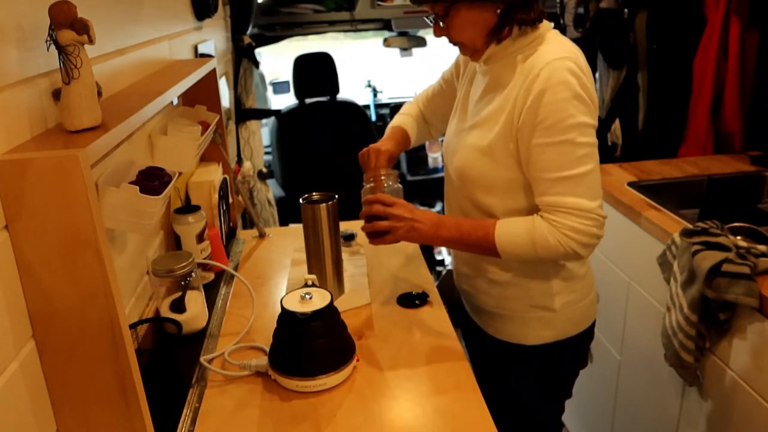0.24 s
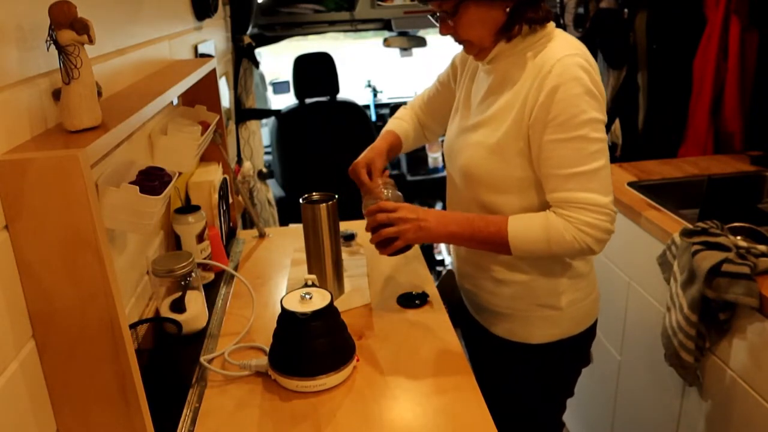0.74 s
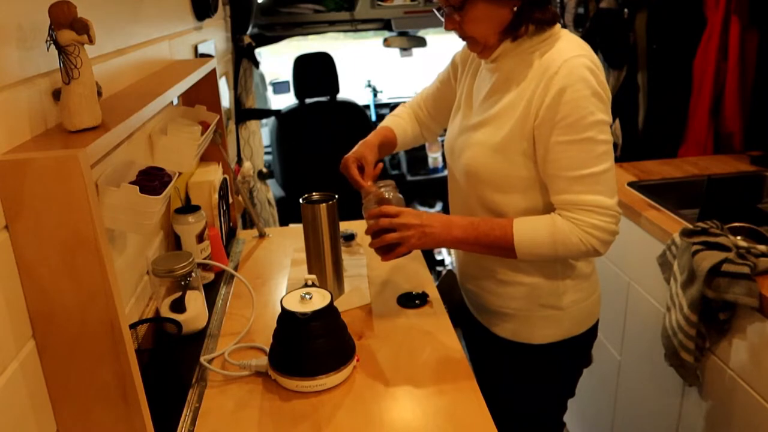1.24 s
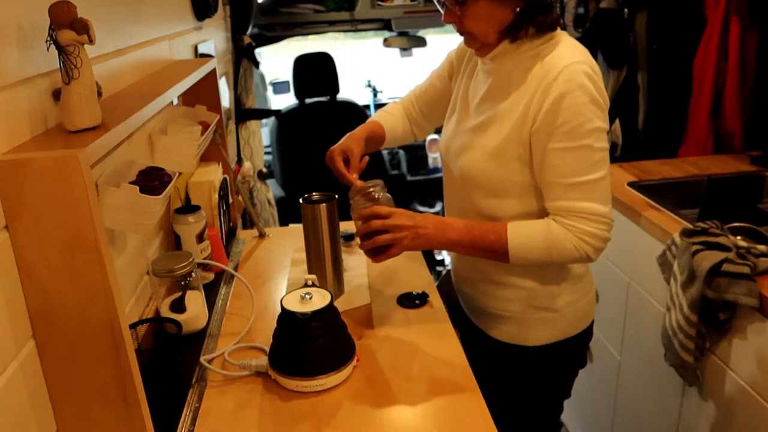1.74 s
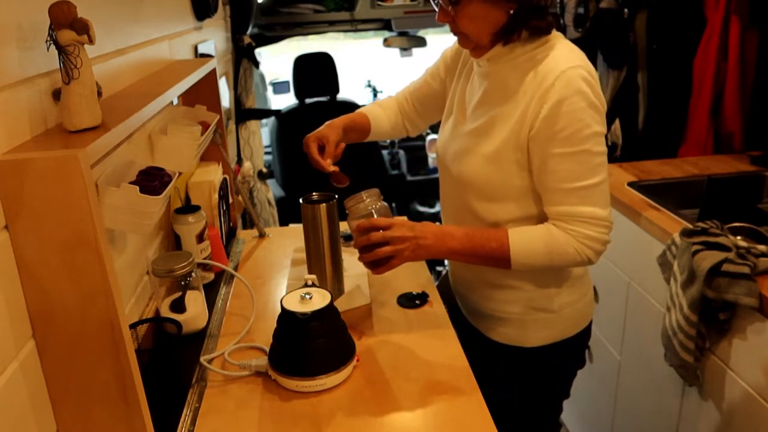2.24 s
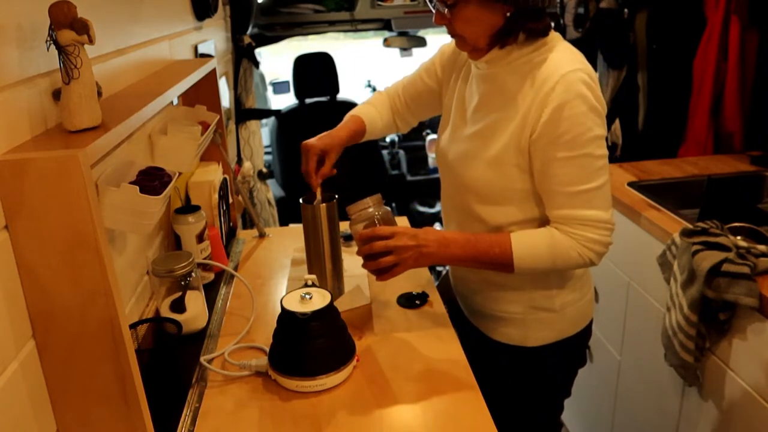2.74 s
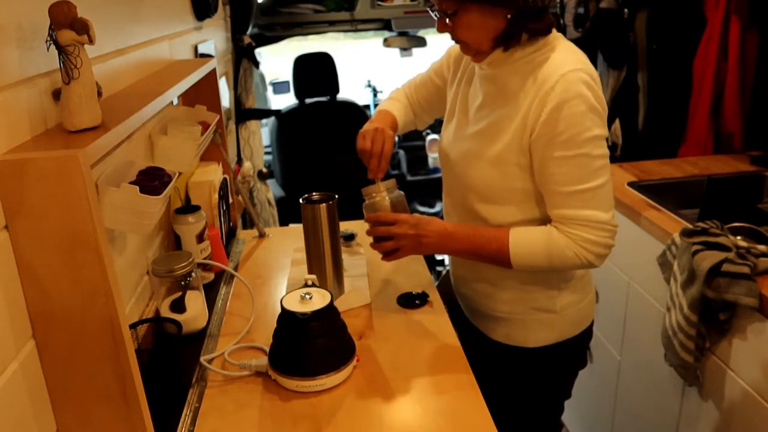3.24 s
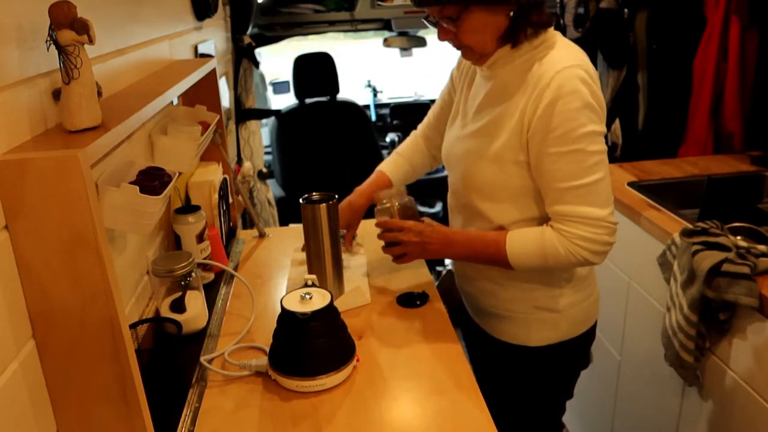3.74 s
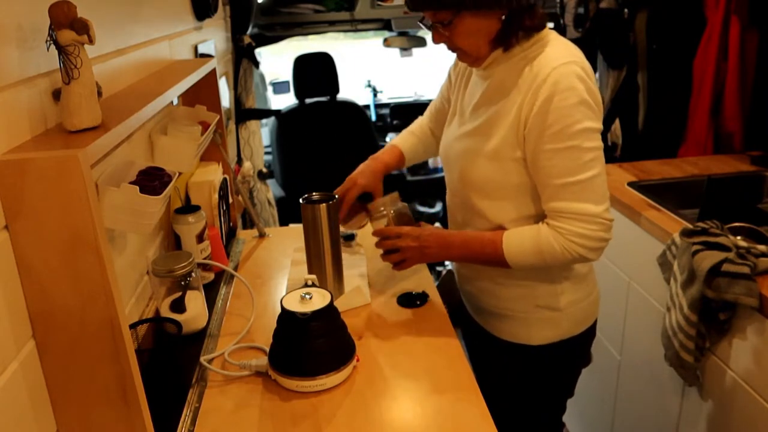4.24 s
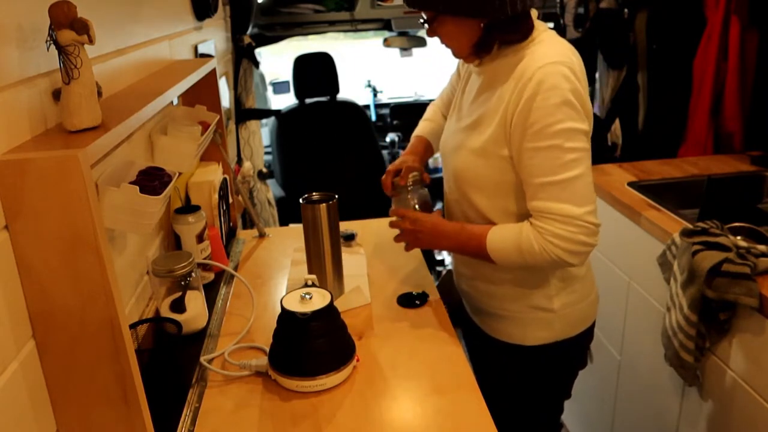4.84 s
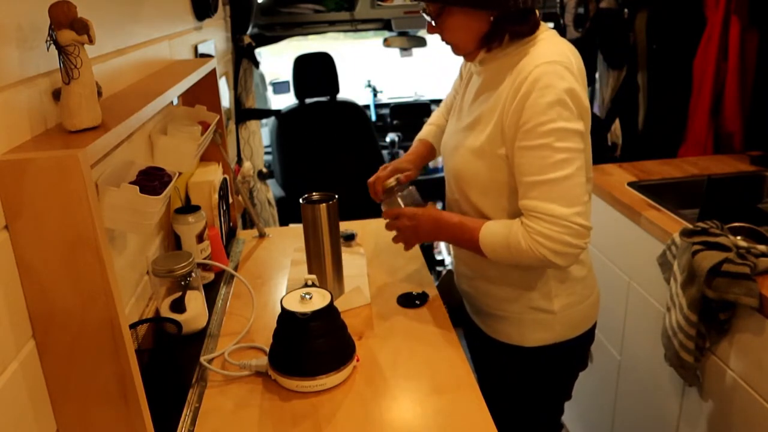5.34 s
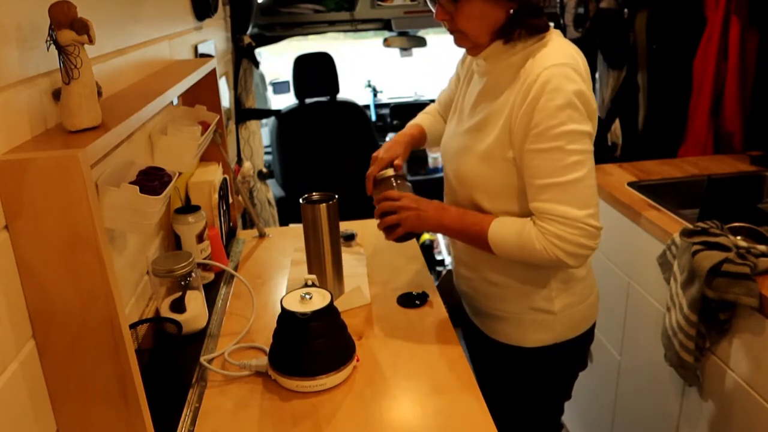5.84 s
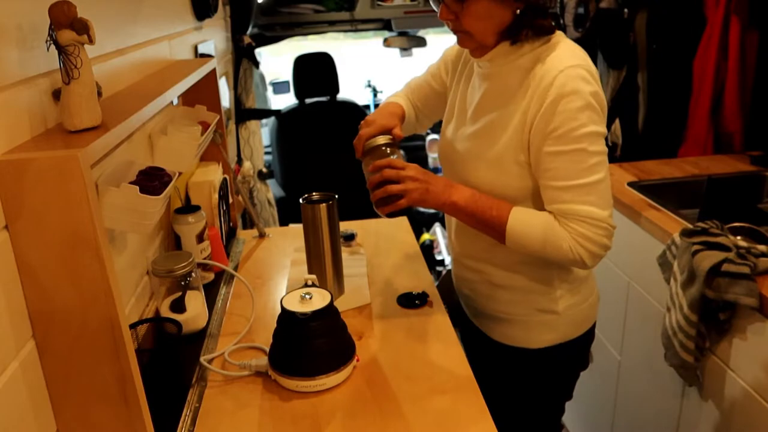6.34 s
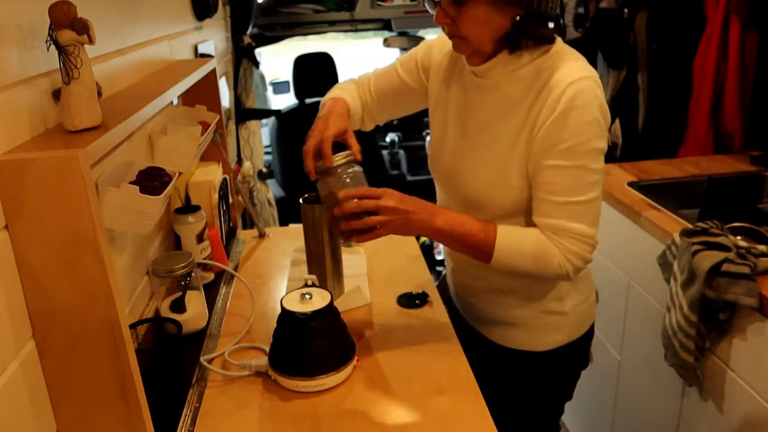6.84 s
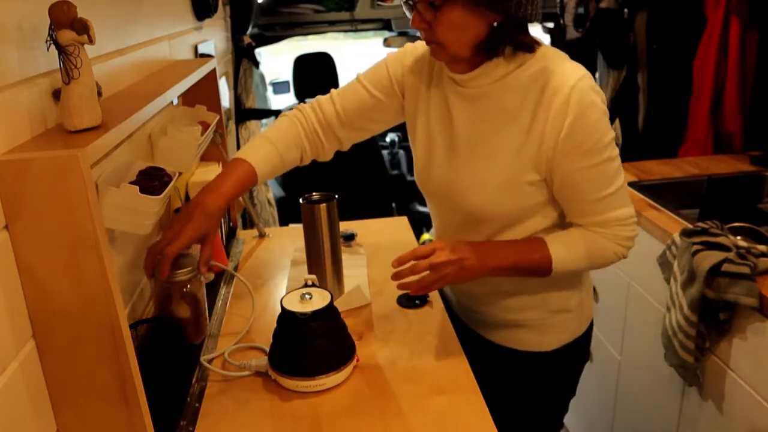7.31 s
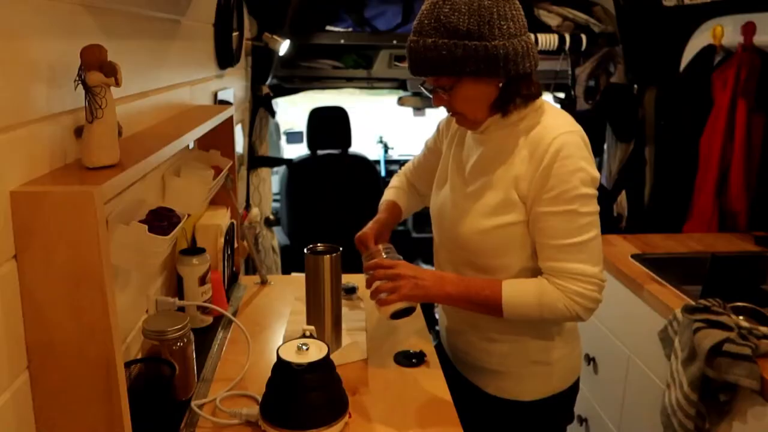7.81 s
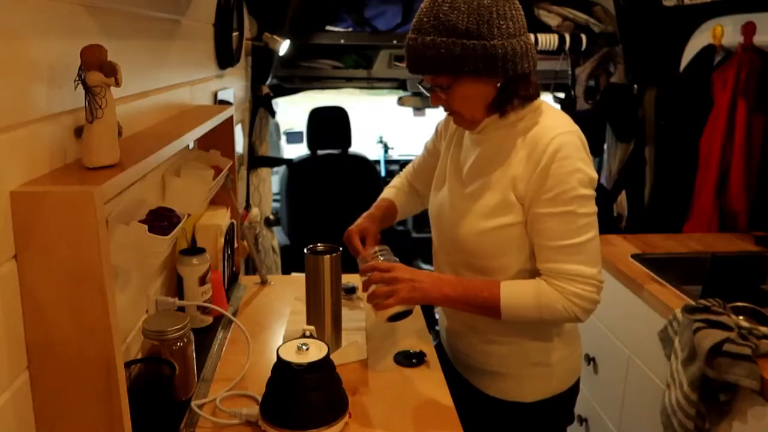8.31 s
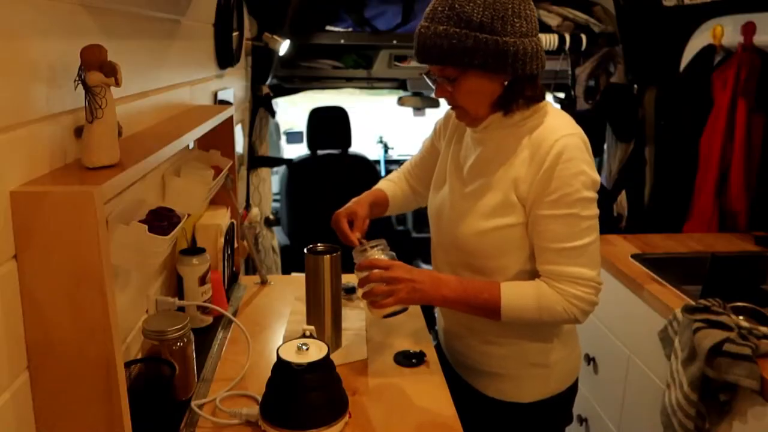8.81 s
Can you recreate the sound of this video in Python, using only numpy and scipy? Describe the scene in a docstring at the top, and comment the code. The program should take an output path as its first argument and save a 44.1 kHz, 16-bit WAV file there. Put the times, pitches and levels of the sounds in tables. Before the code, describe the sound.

A spoon scoops dry granules from a glass jar, they patter into a steel flask, then glassy clinks and lid knocks over a soft fan hum.

```python
"""A small knock over a humming fan, then a spoon scooping dry granules from a glass jar in a small kitchen.
Granules patter into a steel flask, the spoon clinks on glass, the lid is knocked on and screwed down;
the jar is put away with dull thuds and a second one is scooped. A faint, regular high squeak runs along.
Scoops and rubs are filtered micro-impacts, the flask is a bank of resonators fed by random grains,
blows on the jar are decaying modes with noise at the contact, and the fan is hum lines over coloured noise."""
import sys
import numpy as np
from scipy import signal
from scipy.fft import rfft, irfft, next_fast_len
from scipy.io import wavfile
from scipy.ndimage import uniform_filter1d

SR = 44100
rng = np.random.default_rng(int(sys.argv[2]) if len(sys.argv) > 2 else 0)


def digitize_waveform(pressure):
    """Quantize a signal to 16-bit integers and store it at the path in sys.argv[1].

    Rows of a 2-D input are taken as channels; values are limited to [-1, 1].
    """
    field = np.atleast_2d(pressure).T
    bounded = np.clip(field, -1, 1)
    quanta = np.round(bounded * 32767).astype(np.int16)
    wavfile.write(sys.argv[1], SR, quanta)


N = 399987

# All levels in the tables are relative unless marked otherwise.
# Spoon strokes through the granules: start_s, length_s, level_db, swell_db (over the stroke),
# hollow_db and treble_db (against the level), dulling_db (over the stroke)
SCOOPS = [(.155, 0.13, -42.5, -1, -1, -15.5, 13.5), (.375, .31, -39.5, 5.5, -11, -7, -1),
          (3.345, 0.063, -45.5, 5, 1, -3.5, 9.5), (7.68, 0.18, -45.5, -1.5, -4, -8, -0.5),
          (7.92, 0.072, -37.5, 12, -17, -8.5, 1)]
# Spectrum of the granules under the spoon: freq_hz, density_db (per Hz)
SCOOP_COLOUR = [(400, -25), (650, -4.5), (950, -0.5), (1090, -2), (1380, 3), (1600, -1), (2300, 6.5),
                (3200, 1), (3900, -4.5), (5500, -12), (6800, -14), (7700, -18.5), (10500, -22),
                (13500, -25.5), (15500, -42)]
# Metal sliding on the glass rim and thread: start_s, length_s, level_db, swell_db, hollow_db,
# treble_db, dulling_db, as for the spoon strokes
RUBS = [(4.56, 0.071, -39, 3, -16, -3.5, 14), (4.932, 0.02, -41.5, -1, 5.5, -6, 11),
        (5.32, 0.23, -51.5, 0, -0.5, -0.5, 1), (5.75, 0.1, -45, -10, -2, -4.5, 1),
        (6.025, 0.053, -39, -4, -1, -7, 4), (6.232, 0.082, -41, 3.5, 1.5, -8, -7),
        (6.526, .016, -46, -2, 1, -8, 2), (6.573, 0.014, -46.5, -2, 0, -7.5, 3)]
# Spectrum of metal on glass: freq_hz, density_db (per Hz)
RUB_COLOUR = [(200, -6), (390, 12.5), (500, 6), (630, 1), (800, 3), (950, 1), (1490, -5), (2300, -2),
              (2750, -3), (3450, -3.5), (4000, -14.5), (5200, -17), (7500, -22.5), (10000, -21.5),
              (12500, -21), (15500, -38)]
# Granules falling into the flask, a clump and then a stream: time_s, flow_db
POUR = [(2.77, -42), (2.815, -30), (2.822, -14), (2.84, -29), (2.895, -20.5), (2.955, -25.5), (3.0, -32),
        (3.06, -44), (3.14, -62)]
# Ringing modes of the steel flask: freq_hz, level_db, t60_s
FLASK = [(1545, -24, 1), (1836, -22, 1), (2078, 2, .12), (2328, -8, 1.1), (4710, -14, .75), (5179, -20, .5),
         (7820, -6, .1), (9620, -7, .09), (9798, -9, .1), (2040, -3, .1), (2145, -5, .1), (2860, -17, .046),
         (3140, -9, .08), (3340, -10, .06), (3620, -20, .04), (4840, -21, .05), (5959, -19, .06),
         (7040, -20, .1), (8800, -15, .026), (10250, -13, .028), (10540, -11, .05), (10690, -11, .05),
         (11350, -12, .025), (11650, -16, .06), (12120, -16, .06), (12550, -19, .025), (13300, -16, .025)]
# Dry patter of granules on the steel: freq_hz, density_db (per Hz)
PATTER = [(1500, -37), (3000, 2), (4300, -15), (7000, -7), (10500, 1), (13500, -1), (15500, -23)]
# Spoon tapping the glass: start_s, level_db, pitch_hz (the favoured one), hardness_db
CLINKS = [(4.032, -44, 2000, 0), (4.163, -34, 2010, -6), (4.4424, -19.5, 2000, 2), (4.4483, -13.5, 2686, 3),
          (4.4762, -8.5, 1950, -9), (4.5438, -13, 3330, 6), (4.562, -24.5, 2120, -1), (4.574, -24, 3200, 4),
          (4.762, -20.5, 2020, -5), (4.887, -37, 2700, 10), (6.575, -34, 2010, -5)]
# Lid and spoon knocking on the jar: start_s, level_db, pitch_hz (the favoured one), hardness_db
KNOCKS = [(.033, -30, 2660, 7), (4.3585, -10, 1433, 7), (4.584, -22.5, 3200, 19), (4.603, -14.5, 1285, 1),
          (4.615, -19, 2790, 10), (4.753, -27.5, 2110, -2), (4.776, -8.5, 1954, 4),
          (4.939, -29, 1380, 19.5), (5.109, -23, 2780, 7), (5.117, -12, 2350, 14), (5.898, -24.5, 2930, -8),
          (5.978, -28, 1010, -20), (6.005, -26, 1490, -6), (6.035, -21.5, 3200, -8), (6.2, -11, 3230, -11),
          (6.202, -7.5, 1415, -5), (6.247, -19.5, 1770, -4), (6.273, -19, 1780, 4), (6.287, -12, 1510, -13),
          (6.478, -36, 1460, 11), (6.523, -29, 1900, -11), (6.873, -39, 3320, 11), (7.428, -33.5, 1250, -8),
          (7.916, -25, 2880, 10)]
# Modes of the hand-held glass jar: freq_hz, level_db, t60_s (before each use scales it)
JAR = [(623, -1.5, 0.14), (646, -2, 0.12), (786, 0.5, 0.095), (985, 0, 0.079), (1226, 0.5, 0.096),
       (1343, 9.5, 0.031), (1510, 1, 0.035), (1796, 1, 0.11), (2005, 3.5, 0.071), (2103, -4, 0.25),
       (2420, -5, 0.031), (2595, -6, 0.31), (2770, 7, 0.08), (2953, 2.5, 0.045), (3225, 1, 0.051),
       (3300, 4, 0.053), (3360, 12.5, 0.015), (3640, -2, 0.14), (4004, 13, 0.02), (4410, -2, 0.071),
       (4570, -6.5, 0.14), (4624, -0.5, 0.075), (5064, 4.5, 0.04), (5500, -7, 0.066), (6650, -1.5, 0.064),
       (7300, -19, .09)]
# Crack of noise at the contact: freq_hz, density_db (per Hz)
CRACK = [(150, -3.5), (500, 1.5), (830, -6.5), (1300, -0.5), (3200, -1), (5000, -15.5), (7500, -31),
         (15000, -60)]
# Bright tick at the contact: freq_hz, density_db (per Hz)
TICK = [(4500, -28), (5700, 6), (6300, 7), (6900, -2), (7600, -6), (9000, 0), (10200, -3.5), (12000, -6.5),
        (13500, -7), (15500, -37)]
# Dull thuds of jar, hand and shelf: start_s, level_db, pitch_hz
THUDS = [(4.358, -33.5, 388), (4.581, -32, 385), (4.617, -20, 320), (4.755, -24.5, 242), (4.775, -16, 231),
         (4.894, -27, 217), (4.92, -24, 209), (4.939, -24.5, 184), (5.114, -19, 240), (5.332, -31.5, 181),
         (6.032, -23.5, 195), (6.2, -21.5, 214), (6.284, -24.5, 201), (7.514, -22.5, 110), (7.54, -24, 70)]
# Fan and mains lines: freq_hz, level_db (rms, before the waver)
HUM = [(60, -57), (120, -57), (149.8, -44), (209, -59), (314.4, -57.5), (390, -63), (452, -62)]
# Rush of air from the fan: freq_hz, density_db (per Hz)
AIR = [(20, -30), (40, -6), (58, -11), (80, -8.5), (125, -14.5), (200, 0), (300, -7), (520, -12),
       (680, -19), (790, -13.5), (1000, -20), (3000, -25.5), (8000, -36), (11000, -39), (15500, -50)]
# Runs of squeak pairs: first_s, end_s
SQUEAK_RUNS = [(0.156, 7.65), (7.852, 9.8)]
# Tone of the reflections from the sides: freq_hz, side_db
WIDTH = [(100, -35), (400, -13), (700, -11), (1300, -19), (2400, -14), (4400, 0), (8000, 4), (11500, 7.5)]
# Width of the fan's air: freq_hz, side_db
AIR_WIDTH = [(60, -9), (200, -9.5), (380, -3), (700, -1), (1400, -1.5), (15000, -4)]

SQUEAK_PERIOD_S, CUTOFF_HZ = .2182, 15800
T = np.arange(N) / SR
BLOW_T = T[:SR // 2]   # half a second for each blow
SPARKLE_DULLING = 3.1   # the top range dulls this many times faster than the hiss as the spoon sinks in
# A hard contact rings the rim more; by these shares it adds tick and takes away hollow body
HARD_TICK_SHARE, HARD_HOLLOW_SHARE = 0.43, 0.4
# After a knock the metal seats with a softer second touch on the wall
SEAT_S, SEAT_DB, SEAT_HZ, SEAT_HARDNESS_DB = 0.0038, -6, 2000, -8


def friction(pressures, spectrum, edges_hz, per_s, spread_db, jerk_db, glass_db, gains_db):
    """Dense micro-impacts under an unsteady hand ring partly in the glass; each range has its own pressure."""
    clicks = grains(per_s, spread_db) * from_db(jerk_db * drift(90))
    glass = jar_ring(0, SR, 0.52, 1 / SR, 1, 0, 1)   # all modes, none favoured
    ringing = signal.fftconvolve(clicks, glass / np.linalg.norm(glass))[:N]
    clicks = clicks + from_db(glass_db) * ringing
    grit = colour(np.pad(clicks, (0, next_fast_len(N) - N)), spectrum)[:N]
    ranges = []
    for hz in edges_hz:
        ranges.append(cut(grit, hz, "low"))
        grit = cut(grit, hz, "high")
    ranges.append(grit)
    return sum(from_db(gains_db[k]) * rms_one(part) * pressures[k] for k, part in enumerate(ranges))


def strokes(rows, attack_share, release_s):
    """Each stroke rises, swells and lets go, dulling on its way; gains for body, scratch, hiss and sparkle."""
    gains = np.zeros((4, N))
    for start, length, db, swell, hollow, treble, dulling in rows:
        progress = np.clip((T - start) / length, 0, 1) - .5
        before = np.maximum(start - T, 0) / (attack_share * length)
        after = np.maximum(T - start - length, 0) / release_s
        # 20 dB down for each attack or release time away from the stroke
        pressure = from_db(db + swell * progress - 20 * np.minimum(before + after, 10))
        hiss = treble - dulling * progress
        sparkle = treble - SPARKLE_DULLING * dulling * progress
        for k, shade_db in enumerate([hollow, 0, hiss, sparkle]):
            gains[k] += pressure * from_db(shade_db)
    return gains


def grains(per_s, spread_db):
    """Random tiny impacts of uneven size and either sign."""
    sizes = from_db(spread_db * np.minimum(rng.exponential(1, N), 4)) * rng.choice([-1, 1], N)
    return sizes * (rng.random(N) < per_s / SR)


def pour(per_s, ring_db, patter_db):
    """Random granule impacts excite the flask's damped resonances, over a dry patter of noise."""
    flow, rings = level(POUR), np.zeros(N)
    for hz, db, t60 in FLASK:
        radius = from_db(-60 / (t60 * SR))
        angle = 2 * np.pi * hz / SR
        impacts = flow * grains(per_s, 3.9)
        resonator = [1, -2 * radius * np.cos(angle), radius * radius]
        rings += from_db(db) * rms_one(signal.lfilter([1], resonator, impacts + 1e-18))
    return from_db(ring_db) * rings + from_db(patter_db) * flow * noise(PATTER, N)


def jar_blows(blows, attack_s, ring_share, focus_db, focus_octaves, ring_db, hollow_db, rim_db,
              crack_db, crack_t60, tick_db, tick_t60):
    """Each blow rings the jar's hollow, wall and rim modes, with a crack and a bright tick at the contact."""
    out, rise_s = np.zeros(N), max(attack_s, 1 / SR)
    for s, peak, pitch_hz, hardness in blows:
        hollow = (0, 1120, hollow_db - HARD_HOLLOW_SHARE * hardness)
        wall = (1120, 4000, ring_db)
        rim = (4000, SR, rim_db + hardness)
        for low_hz, high_hz, db in [hollow, wall, rim]:
            ring = jar_ring(low_hz, high_hz, ring_share, rise_s, pitch_hz, focus_db, focus_octaves)
            add(out, s, from_db(peak + db) * ring)
        crack = onset_one(noise(CRACK, len(BLOW_T)) * fade(crack_t60, rise_s))
        add(out, s, from_db(peak + crack_db) * crack)
        tick = onset_one(noise(TICK, len(BLOW_T)) * fade(tick_t60, rise_s))
        add(out, s, from_db(peak + tick_db + HARD_TICK_SHARE * hardness) * tick)
    return out


def jar_ring(low_hz, high_hz, length, rise_s, pitch_hz, focus_db, focus_octaves):
    """One blow on the jar's modes in a range; the place of contact favours those near one pitch."""
    ring = 0
    for hz, db, t60 in JAR:
        if low_hz <= hz < high_hz:
            favour = np.exp(-(np.log2(hz / pitch_hz) / focus_octaves) ** 2)
            strength = from_db(db + focus_db * favour + rng.normal(0, 1.5))
            tone = np.sin(2 * np.pi * (hz * BLOW_T + rng.random()))
            ring = ring + strength * tone * fade(t60 * length, rise_s)
    return onset_one(ring)


def seated(knocks):
    """Every knock together with its second touch, as the metal seats on the wall."""
    touches = [(s + SEAT_S, peak + SEAT_DB, SEAT_HZ, SEAT_HARDNESS_DB) for s, peak, _, _ in knocks]
    return list(knocks) + touches


def thuds(gain_db, t60, rattle_db, rattle_t60):
    """A heavily damped low mode, with a woody rattle of noise that outlasts it."""
    out = np.zeros(N)
    for s, db, hz in THUDS:
        boom = np.sin(2 * np.pi * hz * BLOW_T) * fade(t60, 0.0076)
        # the spectrum steps down by 4 dB at twice the pitch
        spectrum = [(hz / 4, -32), (hz / 2, -5), (hz * 2.0, 0), (hz * 2, -4), (hz * 4, -24), (hz * 10, -60)]
        rattle = noise(spectrum, len(BLOW_T)) * fade(rattle_t60, 0.0011)
        add(out, s, from_db(db + gain_db) * (peak_one(boom) + from_db(rattle_db) * peak_one(rattle)))
    return out


def squeaks(squeak_db, first_hz, second_hz, gap_s, t60, rasp_hz):
    """Something turning squeaks twice a round; each raspy squeak slides down in pitch."""
    out = np.zeros(N)
    envelope = peak_one(fade(t60, 0.0081))
    for first, last in SQUEAK_RUNS:
        for s in np.arange(first, last, SQUEAK_PERIOD_S):
            for delay, end_hz, slide_hz in [(0, first_hz, 900), (gap_s, second_hz, 2400)]:
                rasp = rasp_hz * rms_one(uniform_filter1d(rng.standard_normal(len(BLOW_T)), size=30))
                hz = end_hz + slide_hz * np.exp(-BLOW_T / 0.0044) + rasp
                tone = np.sin(2 * np.pi * np.cumsum(hz) / SR)
                add(out, s + delay, from_db(squeak_db + rng.normal(0, 1)) * tone * envelope)
    return out


def fan(air_db, waver_db):
    """Gently wavering hum lines over a rush of air that is wider in the treble; mid and side."""
    hum = np.zeros(N)
    for hz, db in HUM:
        gain = np.sqrt(2) * from_db(db + waver_db * drift(6))   # root two turns rms into peak
        hum += gain * np.sin(2 * np.pi * (hz * T + rng.random()) + 0.052 * drift(4.4))
    mid = from_db(air_db) * noise(AIR, N)
    side = from_db(air_db) * colour(noise(AIR, next_fast_len(N)), AIR_WIDTH)[:N]
    return hum + mid, side


def kitchen(x, wet_db, side_db, t60):
    """Close walls answer at once and die quickly, modelled as decaying noise; returns mid and side."""
    tail = rng.standard_normal(len(BLOW_T)) * fade(t60, 0.0096)
    mid = x + from_db(wet_db) * signal.fftconvolve(x, tail / np.linalg.norm(tail))[:N]
    delayed = np.pad(mid, (40, next_fast_len(N + 40) - N - 40))   # 40 samples late
    sideways = scatter(delayed, [.0011, .0023, .0037])
    return mid, from_db(side_db) * colour(sideways, WIDTH)[:N]


def scatter(x, delays_s):
    """Nearby surfaces smear a sound over a few milliseconds without colouring it (allpasses)."""
    for delay in delays_s:
        loop = np.zeros(round(delay * SR) + 1)
        loop[0], loop[-1] = 1, -.5
        x = signal.lfilter(loop[::-1], loop, x + 1e-18)
    return x


def from_db(db):
    """Decibels to gain."""
    return 10 ** (np.asarray(db) / 20)


def rms_one(x):
    """Scale to unit power."""
    return x / np.sqrt(np.mean(x ** 2) + 1e-20)


def peak_one(x):
    """Scale to unit height."""
    return x / (np.abs(x).max() + 1e-20)


def onset_one(x):
    """Scale a blow to the power of a unit sine over its first 12 ms."""
    return x / np.sqrt(2 * np.mean(x[:round(.012 * SR)] ** 2) + 1e-20)


def level(rows, column=1):
    """Gain over time from a dB column, silent outside its rows."""
    rows = np.array(rows)
    return from_db(np.interp(T, rows[:, 0], rows[:, column], left=-200, right=-200))


def colour(x, points):
    """Filter a sound by a (Hz, dB) curve, interpolated over log frequency."""
    hz, db = np.transpose(points)
    bins = np.maximum(np.fft.rfftfreq(len(x), 1 / SR), 1)
    return irfft(rfft(x) * from_db(np.interp(np.log(bins), np.log(hz), db)), len(x))


def noise(points, size):
    """Coloured noise of unit power."""
    return rms_one(colour(rng.standard_normal(next_fast_len(size)), points)[:size])


def cut(x, hz, kind):
    """Causal high- or low-pass."""
    return signal.sosfilt(signal.butter(4, min(hz, SR / 2 - 1), kind, fs=SR, output="sos"), x)


def drift(rate):
    """Random wander of unit power, with this many turning points a second."""
    knots = rng.standard_normal(2000)
    return rms_one(np.interp(T * rate, np.arange(len(knots)), knots))


def fade(t60, rise_s):
    """Envelope of a blow: a quick rise, then an exponential decay."""
    return from_db(-60 * BLOW_T / t60) * (1 - np.exp(-BLOW_T / rise_s))


def add(out, s, sound):
    """Mix a sound in at time s."""
    start = int(np.clip(round(s * SR), 0, N))
    out[start:start + len(sound)] += sound[:N - start]


def scene():
    """All the handling happens straight ahead in one small room, over the wide fan; left and right."""
    scoops = friction(strokes(SCOOPS, attack_share=0.73, release_s=0.07), SCOOP_COLOUR,
                      edges_hz=(1600, 4500, 11000), per_s=3100, spread_db=1.0, jerk_db=1.8,
                      glass_db=-11.5, gains_db=(-1.5, -3.5, -0.7, -15.5))
    rubs = friction(strokes(RUBS, attack_share=0.62, release_s=0.029), RUB_COLOUR,
                    edges_hz=(1600, 4500), per_s=1500, spread_db=1.4, jerk_db=3.0,
                    glass_db=-5.5, gains_db=(-2.2, -1.2, -2.2))
    granules = pour(per_s=2400, ring_db=-58, patter_db=-20.5)
    clinks = jar_blows(CLINKS, attack_s=0.00099, ring_share=1.0, focus_db=23.5, focus_octaves=0.068,
                       ring_db=-8.5, hollow_db=-31.5, rim_db=-29,
                       crack_db=-17.5, crack_t60=0.075, tick_db=-36, tick_t60=0.066)
    knocks = jar_blows(seated(KNOCKS), attack_s=0.00094, ring_share=0.58, focus_db=19, focus_octaves=0.1,
                       ring_db=-14.5, hollow_db=-24, rim_db=-29.5,
                       crack_db=-14.5, crack_t60=0.046, tick_db=-30, tick_t60=0.036)
    bumps = cut(thuds(gain_db=-0.3, t60=0.023, rattle_db=-13.5, rattle_t60=0.17), 53, "high")
    squeaking = squeaks(squeak_db=-55, first_hz=10500, second_hz=8900, gap_s=0.053, t60=0.063, rasp_hz=407)
    handling = scoops + rubs + granules + clinks + knocks + bumps + squeaking
    mid, side = kitchen(handling, wet_db=-10, side_db=-5.5, t60=0.12)
    fan_mid, fan_side = fan(air_db=-48.0, waver_db=0.96)
    return mid + fan_mid + (side + fan_side) * np.array([[1], [-1]])


def record(dry):
    """The top is cut steeply by an elliptic low-pass."""
    return signal.sosfilt(signal.ellip(10, .1, 80, CUTOFF_HZ, fs=SR, output="sos"), dry)


dry = scene()
out = record(dry)
digitize_waveform(out)
```